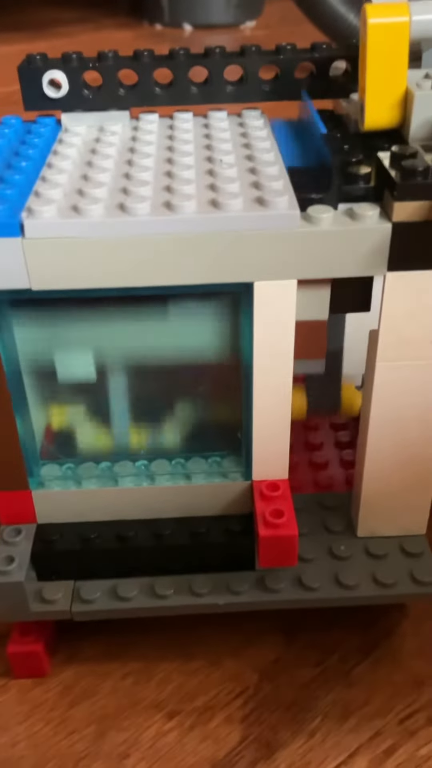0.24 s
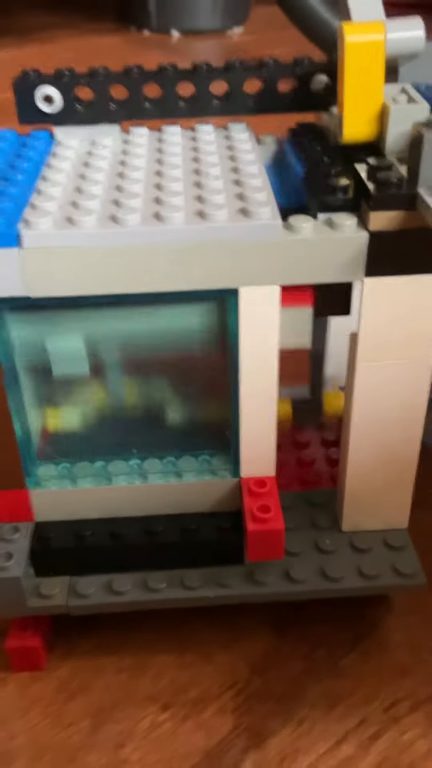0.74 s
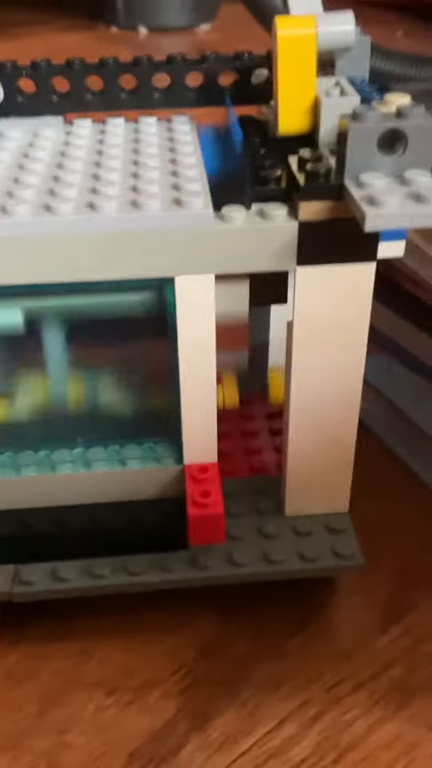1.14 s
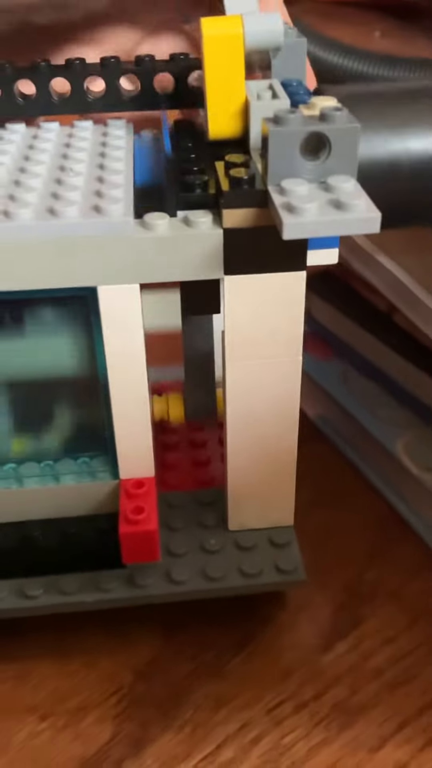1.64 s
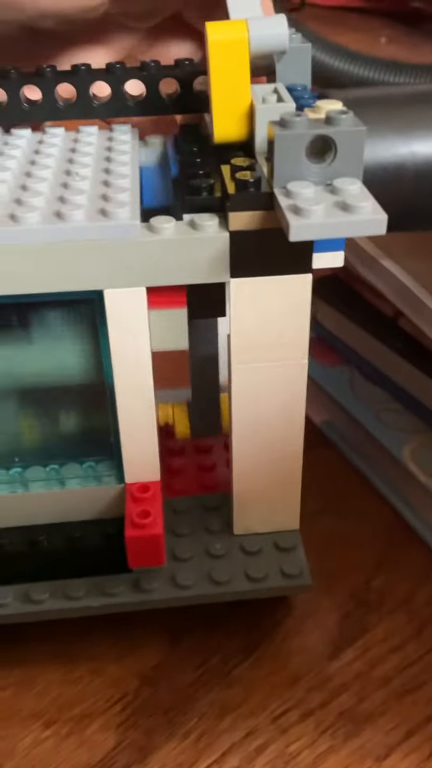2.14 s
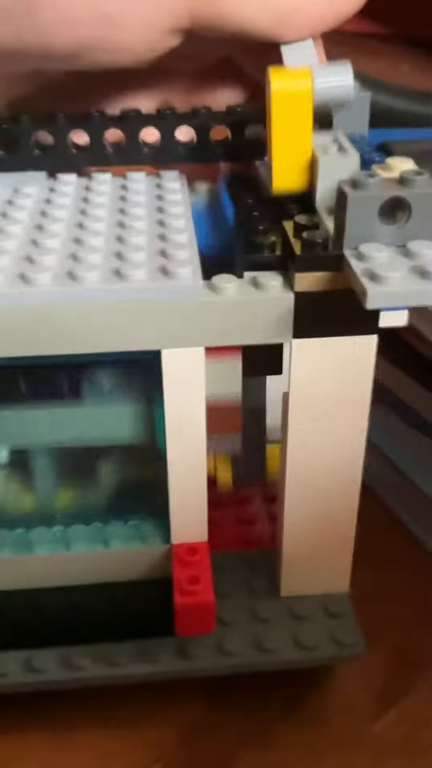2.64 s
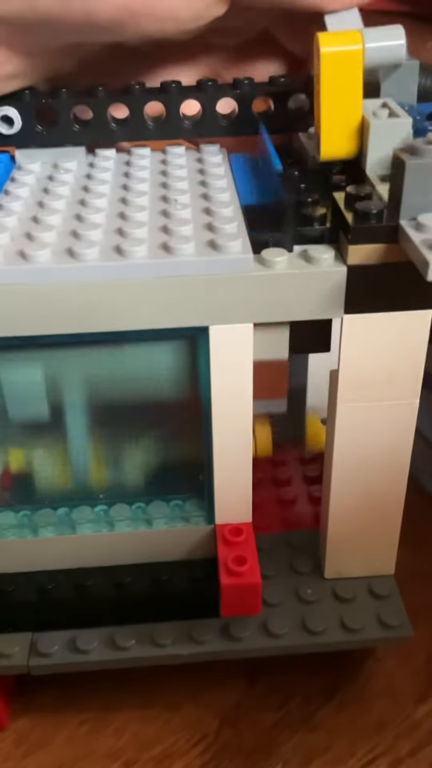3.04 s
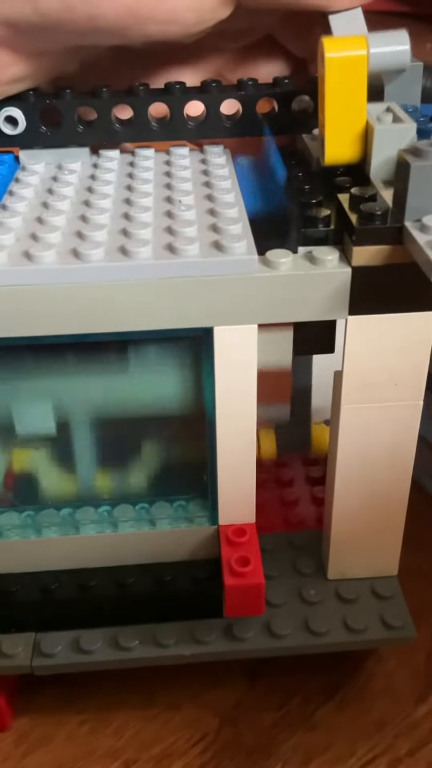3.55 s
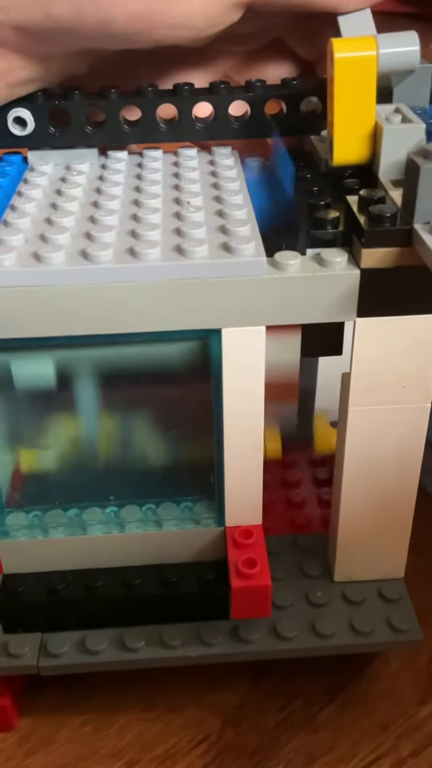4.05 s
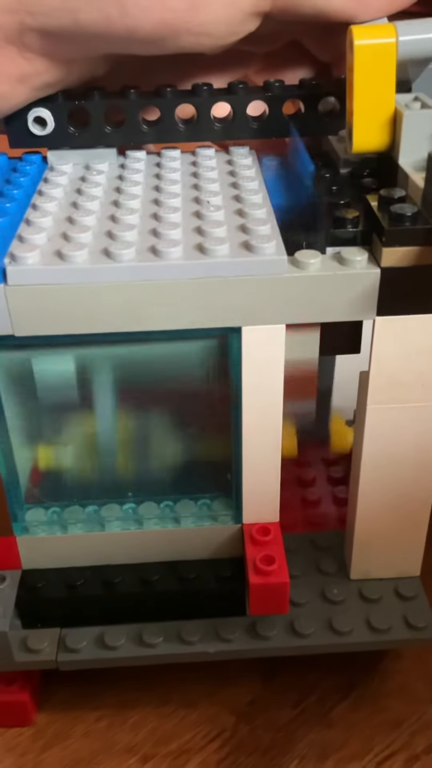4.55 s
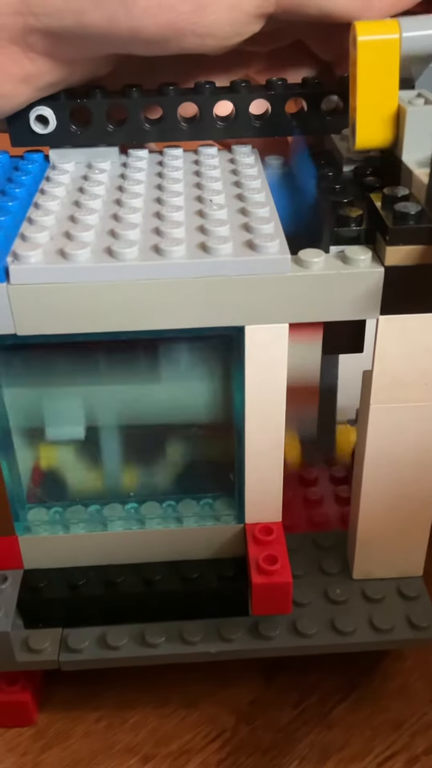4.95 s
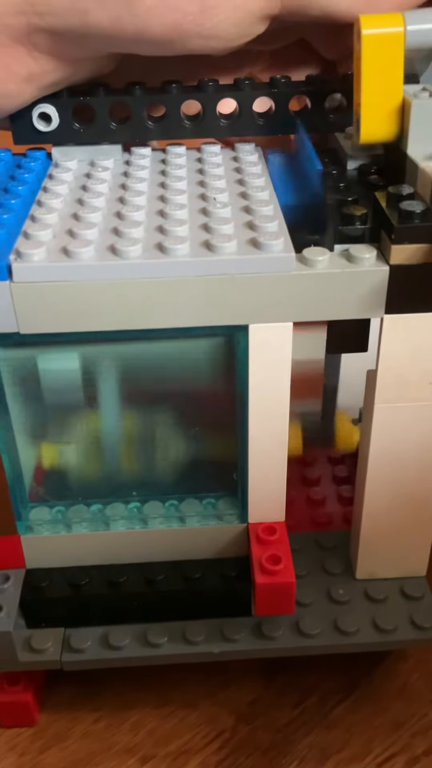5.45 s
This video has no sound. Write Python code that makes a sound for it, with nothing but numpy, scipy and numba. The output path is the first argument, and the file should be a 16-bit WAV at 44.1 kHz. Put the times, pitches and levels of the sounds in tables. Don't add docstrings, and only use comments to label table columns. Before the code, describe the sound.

Close up on a table indoors, a toy plastic engine runs on vacuum suction. Ringing, airy roar and a steady high whine continue throughout. Hollow plastic knocks repeat at about seven turns a second with a hiss each turn, then surge after two seconds to roughly double that, becoming a dense rattling buzz with low table thumps.

```python
import sys
import numpy as np
from scipy import signal
from scipy.fft import rfft, irfft
from scipy.io import wavfile
from scipy.ndimage import uniform_filter1d
from numba import njit

SR = 44100
rng = np.random.default_rng(int(sys.argv[2]) if len(sys.argv) > 2 else 0)


def field_ratio(decibels):
    return 10 ** (np.asarray(decibels, dtype=float) / 20)


def transcribe(u):
    v = np.clip(np.atleast_2d(u).T, -1, 1)
    q = np.round(v * 32767).astype(np.int16)
    wavfile.write(sys.argv[1], SR, q)


N = 250929

# [t/s, phone turned aside 0-1, hand over the engine 0-1]
PHONE_AND_HAND = [(0, .2, 0), (.6, 0, 0), (1.35, 0, 0), (1.6, 1, 0), (2.3, .7, .1), (2.6, .2, .8),
                  (3.3, .8, 1), (3.6, .8, 1), (3.9, .1, 1), (4.7, .1, .6), (5.69, 0, .5)]


def level(x, db):
    return x * field_ratio(db) / np.sqrt(np.mean(x ** 2))


def curves(table):
    s, *columns = np.transpose(table)
    t = np.arange(N) / SR
    return [np.interp(t, s, column) for column in columns]


def walk(rate):
    hold = int(SR / rate)
    steps = np.repeat(rng.standard_normal(N // hold + 1), hold)
    smooth = uniform_filter1d(uniform_filter1d(steps, hold), hold)
    return 1.3 * smooth[:N]


def shape(x, points):
    hz, db = np.transpose(points)
    f = np.arange(N // 2 + 1) * SR / N + 1
    gain = field_ratio(np.interp(np.log(f), np.log(hz), db))
    return irfft(rfft(x) * gain, N)


def coloured(points):
    return level(shape(rng.standard_normal(N), points), 0)


@njit
def svf(x, hz, width):
    y, band, low = np.empty(len(x)), 0., 0.
    for i in range(len(x)):
        g = np.tan(np.pi * hz[i] / SR)
        k = width / hz[i]
        v = (band + g * (x[i] - low)) / (1 + g * (g + k))
        band = 2 * v - band
        low = low + 2 * g * v
        y[i] = k * v
    return y


def add(out, s, x):
    i = max(int(s * SR), 0)
    out[i:i + len(x)] += x[:max(N - i, 0)]


def ring(hz, t60, rise):
    t = np.arange(int(t60 * SR)) / SR
    fade = 1000. ** (-t / t60)
    return -np.sin(2 * np.pi * hz * t) * fade * (1 - np.exp(-t / rise))


def bell(turns, mid, half):
    from_mid = (turns - mid + .5) % 1 - .5
    return np.exp(-np.abs(from_mid / half) ** 3)


def crank():
    # [t/s, crank speed/turns a second]
    crank_speed = [(0.0, 6.88), (1.171, 6.88), (1.751, 7.96), (2.091, 6.86), (2.336, 9.71), (2.603, 7.97),
                   (2.748, 13.25), (2.994, 8.64), (3.241, 15.36), (3.469, 8.14), (3.782, 14.85),
                   (4.109, 10.43), (4.36, 12.78), (5.16, 15.52), (5.328, 13.37), (5.502, 15.99),
                   (5.69, 15.19)]
    start_turn, slow_turns_s, push_smooth_s = .0665, 7, 0.12
    speed = curves(crank_speed)[0]
    fast = np.log2(speed / slow_turns_s)
    push = uniform_filter1d(np.gradient(fast) * SR, int(push_smooth_s * SR))
    return start_turn + np.cumsum(speed) / SR, fast, push


def motor():
    # [t/s, shaft speed/Hz]
    shaft_speed = [(0, 626.3), (.5, 626.85), (2.15, 626.85), (2.6, 626.5), (3.1, 624.8), (3.95, 622.9),
                   (4.25, 623.2), (5.69, 621.5)]
    # [multiple of shaft speed, level/dB, change/dB when phone turns aside, change/dB under the hand]
    whine = [(1, -49, 0, 1), (7, -46, -11, -1), (12, -46.5, -2, -12), (14, -53, -4, -7), (24, -45, -1, -7)]
    turns = np.cumsum(curves(shaft_speed)[0]) / SR
    aside, hand = curves(PHONE_AND_HAND)
    out = np.zeros(N)
    for multiple, db, aside_db, hand_db in whine:
        tone_db = db + aside_db * aside + hand_db * hand + 1.5 * walk(6)
        out += np.sqrt(2) * field_ratio(tone_db) * np.sin(2 * np.pi * multiple * turns)
    return out


def hose(ring_db):
    centres = (238, 303, 1398, 1805, 1845, 2018, 2070, 2384, 2508, 2600, 2691, 2876, 2990, 3088, 3205, 3295,
               3400, 6200, 6550, 6778, 6895, 7065)
    # [width/Hz, level/dB, drift/Hz a second, fade/dB a second]
    resonances = [(28.4, -15.5, 0, 0.93), (26.8, -17, 2.5, 0.06), (29.6, -12, 2, 0), (34.8, -11.5, -4, 0.2),
                  (34.7, -13, -12.5, 1.7), (27.7, -9, 4, -0.3), (50.5, -12, -1, -0.8), (32, -2.5, 1.3, -1),
                  (32.6, -9, -2, -1.9), (35, -11, 7, 2), (22.2, 3, 3, -0.66), (56.4, -1.5, -1.5, -0.1),
                  (37, 4, 4, 0.5), (40.3, -7.5, -5.5, 1), (60.5, -12, 3, 1), (30, -31, 8, -3),
                  (109, -15, 2, -1.2), (40, -16, -14, -1.3), (120, -20.5, 23, -2.5), (30, -15, 0, 1.5),
                  (30, -22, 0, -3), (40, -18, 7.5, -2.5)]
    steady = .2
    t = np.arange(N) / SR - N / SR / 2
    out, noise = np.zeros(N), rng.standard_normal(N)
    for k, (hz, (width, db, drift, fade)) in enumerate(zip(centres, resonances)):
        centre = hz + drift * t + 0.11 * width * walk(3.9)
        mode = svf(svf(noise, centre, 1.5 * width), centre, 1.5 * width)
        power = uniform_filter1d(mode ** 2, int(SR / width / 4)) / np.mean(mode ** 2) + .05
        even = power ** (-steady / 2)
        out += (-1) ** k * mode * even * field_ratio(db + fade * t + 0.5 * walk(8.8))
    return level(out, -1.4) * field_ratio(ring_db)


def air(roar_db):
    # [f/Hz, level/dB per Hz]
    roar_spectrum = [(20, -70), (50, -43), (100, -25), (200, -23.5), (450, -15), (700, -14), (1300, -11.5),
                     (2200, -8.5), (2800, -8), (3500, -8), (4200, -10.5), (6900, -16), (9400, -20),
                     (16000, -28)]
    return coloured(roar_spectrum) * field_ratio(5. + roar_db + .45 * walk(8))


def valve(leak_db, open_share):
    # [f/Hz, level/dB per Hz]
    leak_spectrum = [(7000, -54), (9500, -16), (11000, -4), (12500, -6), (14000, 0.5), (15000, 0.5),
                     (16000, -3.5)]
    # [f/Hz, level/dB per Hz]
    puff_spectrum = [(2500, -32), (4700, -6.5), (5800, 2), (6800, -18), (8300, -3), (10500, -9.5),
                     (12000, -8.5), (13200, -8), (14250, -6), (14800, -11), (15500, -5), (16000, 6)]
    whistle_hz, under_hand_hz, width_hz, whistle_db = 14370, -500, 1500, -6.5
    hand = curves(PHONE_AND_HAND)[1]
    whistle = svf(rng.standard_normal(N), whistle_hz + under_hand_hz * hand, 1. * width_hz)
    puff = coloured(puff_spectrum) + level(whistle, whistle_db)
    return coloured(leak_spectrum) * field_ratio(leak_db) + puff * open_share * field_ratio(-25 + 0.86 * walk(29.3))


def chuff(turns, fast):
    # [place in the turn 0-1, half length/turns, level/dB]
    breaths = [
        (.51, 0.095, -34.5),
        (.9, 0.082, -38),
    ]
    hiss_hz, width_hz, grows_db = 4700, 1130, 4
    hiss = level(svf(rng.standard_normal(N), np.full(N, 1. * hiss_hz), 1. * width_hz), 0)
    breathing = sum(field_ratio(db) * bell(turns, mid, half) for mid, half, db in breaths)
    return hiss * field_ratio(grows_db * fast) * breathing


def rattle(db):
    # [f/Hz, width/Hz, level/dB]
    loose_bricks = [(575, 550, -12), (980, 100, 5), (1570, 280, 4), (1970, 180, -3)]
    taps_per_s, spread_db = 350, 6
    chance = rng.random((3, N))
    size_db = np.minimum(-spread_db * np.log(1 - chance[1]), 12)
    taps = (chance[0] < taps_per_s / SR) * field_ratio(size_db) * np.sign(chance[2] - .5)
    body = np.zeros(N)
    for hz, width, gain_db in loose_bricks:
        body += field_ratio(gain_db) * svf(taps, np.full(N, 1. * hz), 1. * width)
    return level(body, -1) * field_ratio(db)


def knocks(turns, fast, push):
    # [place in the turn 0-1, peak/dB, table thump/dB, brightness/dB an octave]
    stroke = [
        (0.001, -22, -57, 0.5),
        (.29, -28, -58, 6),
        (.475, -27, -62, 7.5),
    ]
    knock_grows_db, thump_grows_db = 5, 11.5
    knock_push_db, thump_push_db = 0.46, 0.9
    knock_scatter_db, thump_scatter_db, bright_scatter_db, slack_turn = 0.7, 0.5, 2, 0.0299
    skipped_turn, skipped_db = 18, -15
    rows, t = [], np.arange(N) / SR
    chance = rng.standard_normal((int(turns[-1]) + 1, len(stroke), 4))
    for k, draws in enumerate(chance):
        skip_db = skipped_db * (k == skipped_turn)
        for (place, db, thump_db, bright_db), (late, hard, heavy, tone) in zip(stroke, draws):
            at = k + place * (1 + 2 * slack_turn * late)
            if turns[0] < at < turns[-1]:
                s = np.interp(at, turns, t)
                f, p = fast[int(s * SR)], push[int(s * SR)]
                peak = db + knock_grows_db * f + knock_push_db * p + knock_scatter_db * hard + skip_db
                thump = thump_db + thump_grows_db * f + thump_push_db * p + thump_scatter_db * heavy
                rows.append((s, peak, thump, bright_db + bright_scatter_db * tone))
    return rows


def stream_dips(hits):
    dip_s, dip_db = 0.04, -0.5
    out, dip = np.zeros(N), np.hanning(int(dip_s * SR))
    for s, db, *_ in hits:
        add(out, s - dip_s / 2, dip_db * field_ratio(db + 20) * dip)
    return out


def piston(hits):
    # [f/Hz, level/dB, t60/s]
    block_modes = [(680, -3, 0.015), (809, -1, 0.011), (1114, -12, 0.041), (1464, -8, 0.016),
                   (2030, -26, 0.0093)]
    # [f/Hz, level/dB, t60/s]
    table_modes = [(75.4, 6.5, 0.035), (108.5, 13.5, 0.051), (153, 9.5, 0.062)]
    # [t/s, f/Hz, level/dB, t60/s]
    hand_bump = (2.445, 25, -22, .04)
    knock_db, knock_rise_s, block_low_hz, thump_lag_s = 7.5, 0.0016, 440, .008
    block, table, thump = np.zeros(N), np.zeros(N), np.zeros(SR // 4)
    for hz, db, t60 in table_modes:
        add(thump, 0, field_ratio(db) * ring(hz, t60, 0.0045))
    chance = rng.standard_normal((len(hits), 2, len(block_modes))) * [[.03], [1.2]]
    for (s, db, thump_db, bright_db), (detune, share_db) in zip(hits, chance):
        for (hz, mode_db, t60), d, extra_db in zip(block_modes, detune, share_db):
            gain = field_ratio(db + knock_db + mode_db + bright_db * np.log2(hz / 800) + extra_db)
            add(block, s, gain * ring(hz * (1 + d), t60, knock_rise_s))
        add(table, s + thump_lag_s, field_ratio(thump_db) * thump)
    bump_s, bump_hz, bump_db, bump_t60 = hand_bump
    add(table, bump_s, field_ratio(bump_db) * ring(bump_hz, bump_t60, .004))
    no_bass = signal.butter(2, block_low_hz, "highpass", fs=SR, output="sos")
    return table + signal.sosfilt(no_bass, block)


def slips():
    # [centre t/s, lowest f/Hz, highest f/Hz, level/dB]
    flickers = [
        (.485, 6200, 8300, -41),
        (1.205, 4600, 5700, -37),
        (1.205, 6900, 8300, -46),
        (1.205, 13100, 14500, -40),
        (3.435, 10300, 12400, -45),
        (3.435, 14500, 15780, -40),
        (3.667, 7600, 9000, -50),
        (3.667, 11700, 13800, -41),
        (4.48, 4600, 5700, -39),
    ]
    out = np.zeros(N)
    for s, low, high, db in flickers:
        band = coloured([(low - 1, -99), (low, 0), (high, 0), (high + 1, -99)])[:2048]
        add(out, s - 1024 / SR, field_ratio(db + 3) * band * np.hanning(2048))
    return np.array([out, -out])


def scene():
    # [t/s, level/dB]
    nearness = [(0, 3), (.3, 1), (1.0, 1.7), (1.4, -0.6), (2.1, -0.5), (3.2, 0.1), (3.9, -0.5), (5.2, -1),
                (5.69, -1.5)]
    # [t/s, level/dB]
    escape = [(0, -.5), (1.2, -.5), (1.6, .5), (2.5, 1.5), (2.75, 0), (2.92, 2), (3.15, -2), (3.4, 2),
              (3.6, -2), (4.2, -4), (5.69, -5)]
    # [level/dB, change/dB per doubling of speed, share of hose loudness]
    layers = [(-21, 0.089, 1.2), (-31, 1.7, 0.36), (-35.5, 5.6, -1.2), (-31, -1.5, 0.22)]
    valve_mid, valve_half = 0.69, 0.29
    puff_fades_db, puff_push_db, shake_push_db = -7, -0.5, 0.5
    clatter_db = -6
    turns, fast, push = crank()
    hits = knocks(turns, fast, push)
    near_db = curves(nearness)[0]
    ring_db, roar_db, rattle_db, leak_db = [db + grows * fast + share * near_db for db, grows, share in layers]
    open_share, dip_db = bell(turns, valve_mid, valve_half), stream_dips(hits)
    puffs = open_share * field_ratio(puff_fades_db * fast + puff_push_db * push + curves(escape)[0])
    stream = hose(ring_db + .5 * dip_db) + air(roar_db + dip_db)
    stream = stream + valve(leak_db + dip_db, puffs) + chuff(turns, fast)
    bricks = rattle(rattle_db + shake_push_db * push + clatter_db * open_share)
    one = motor() + stream + piston(hits) + bricks
    return np.array([one, one])


def low_pass(x):
    return signal.sosfilt(signal.butter(12, 17090, fs=SR, output="sos"), x)


def record(dry):
    # [f/Hz, level/dB]
    microphone = [(4150, -0.5), (4650, 3.5), (5450, -2), (6500, -2), (7480, -0.5), (7650, -6), (8250, -6),
                  (9400, -10.5), (10800, -1.5), (11250, -5), (12000, 2), (15300, 1), (15700, 8)]
    low_hz, top_hz = 68, 15740
    x = shape(dry, microphone) + slips()
    x = shape(x, [(top_hz, 0), (top_hz + 90, -90)])
    x = signal.sosfilt(signal.butter(3, low_hz, "highpass", fs=SR, output="sos"), x)
    return low_pass(x)


dry = scene()
out = record(dry)
transcribe(out)
```